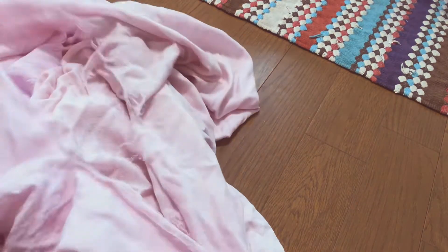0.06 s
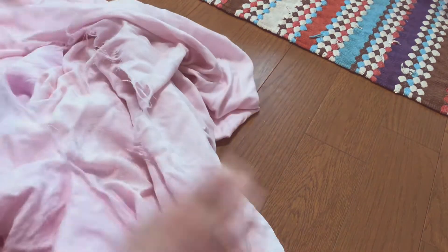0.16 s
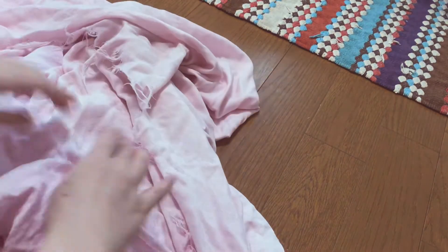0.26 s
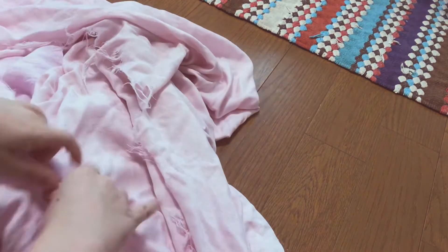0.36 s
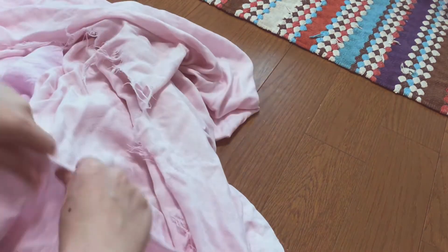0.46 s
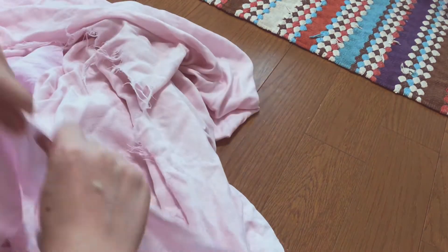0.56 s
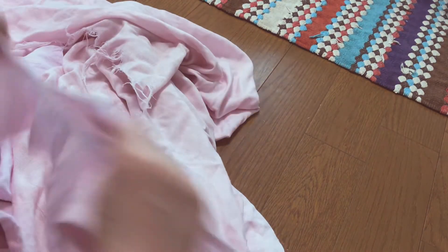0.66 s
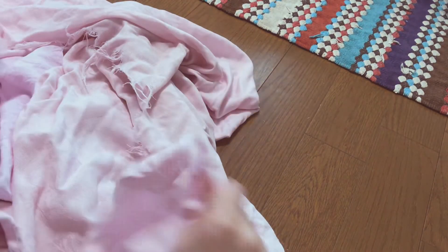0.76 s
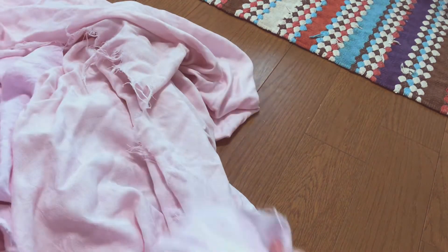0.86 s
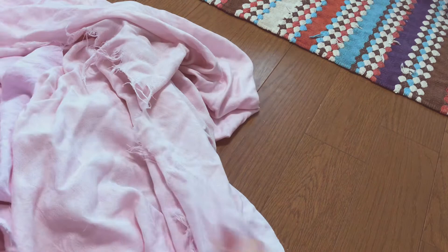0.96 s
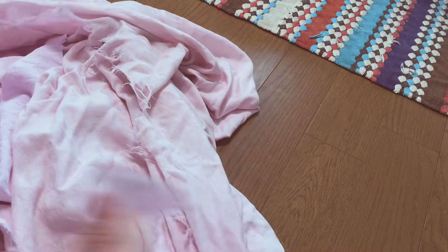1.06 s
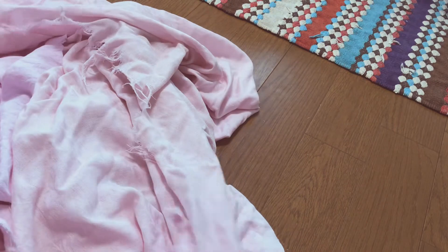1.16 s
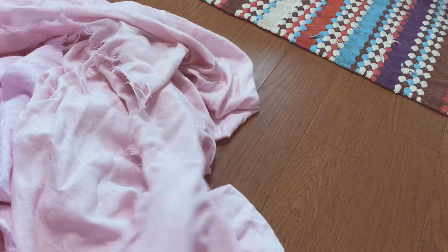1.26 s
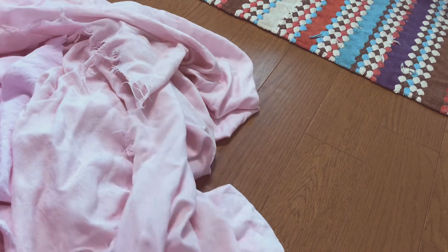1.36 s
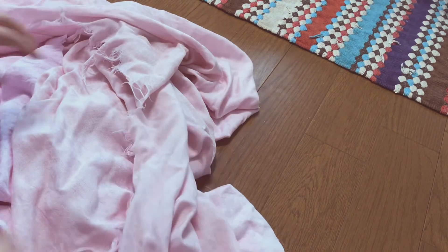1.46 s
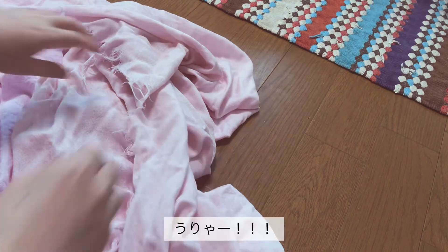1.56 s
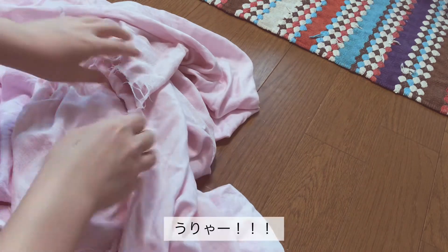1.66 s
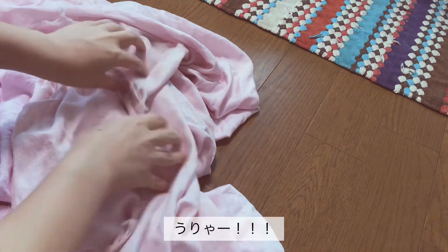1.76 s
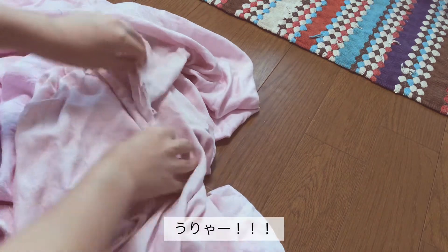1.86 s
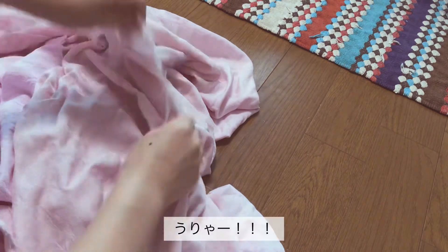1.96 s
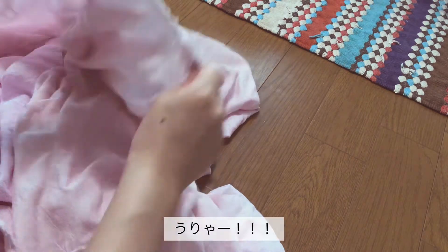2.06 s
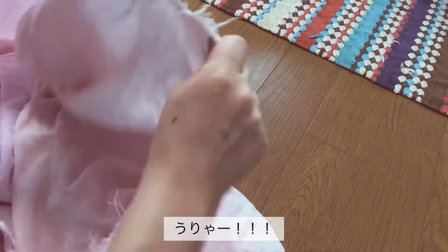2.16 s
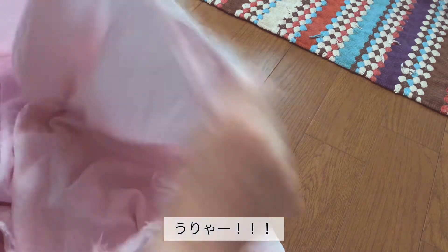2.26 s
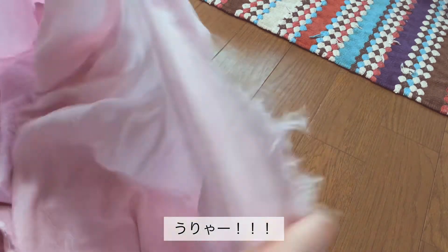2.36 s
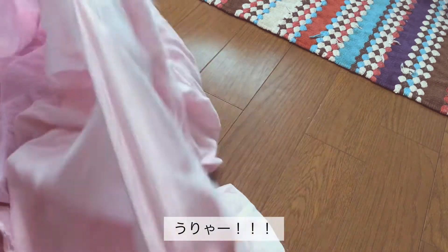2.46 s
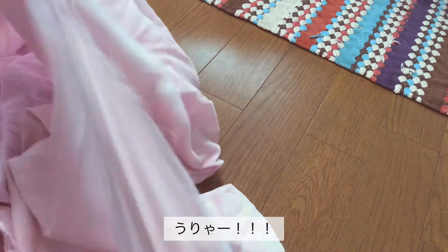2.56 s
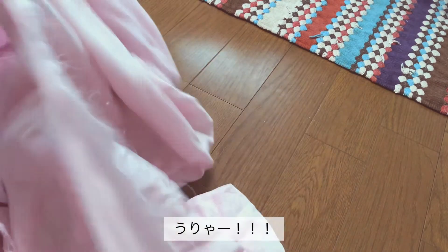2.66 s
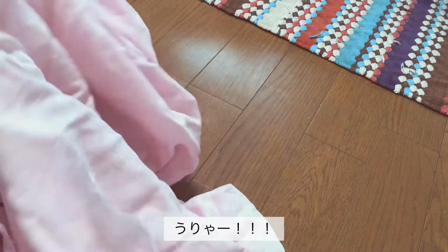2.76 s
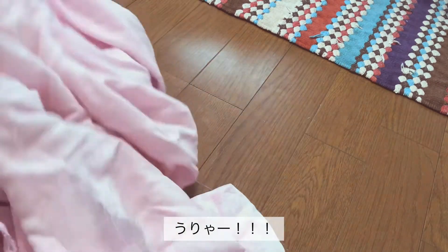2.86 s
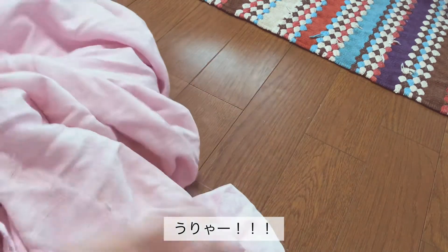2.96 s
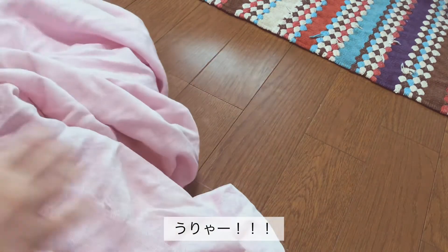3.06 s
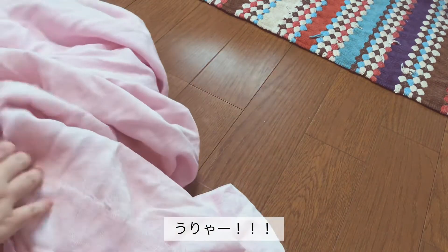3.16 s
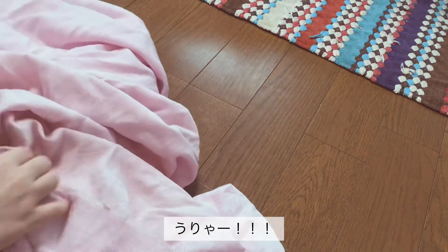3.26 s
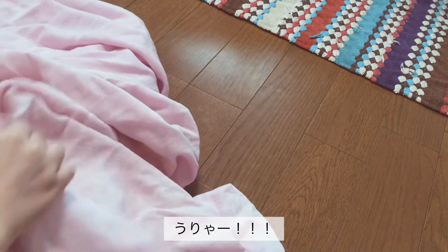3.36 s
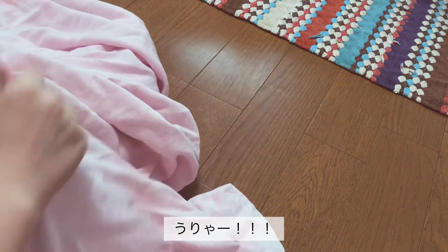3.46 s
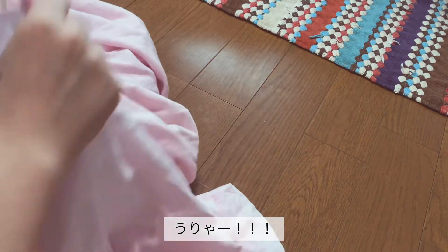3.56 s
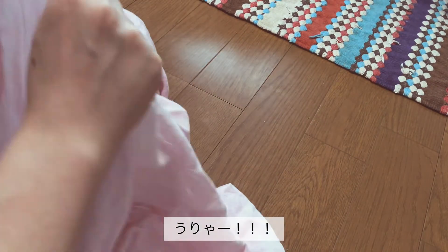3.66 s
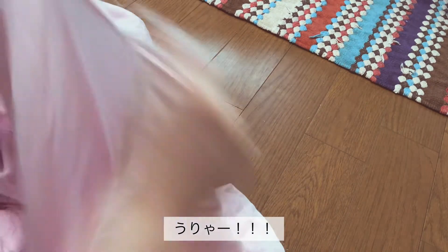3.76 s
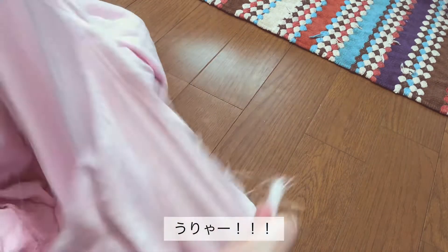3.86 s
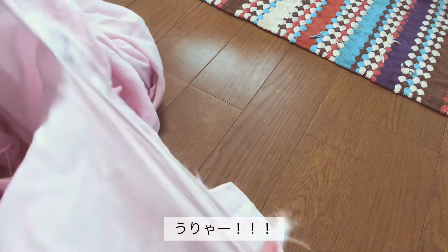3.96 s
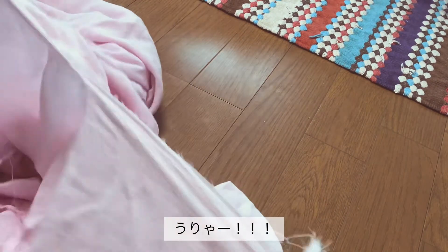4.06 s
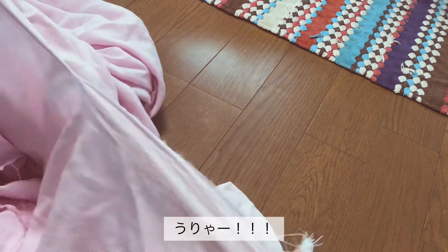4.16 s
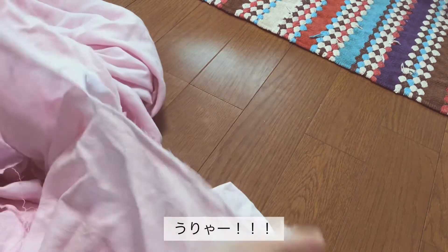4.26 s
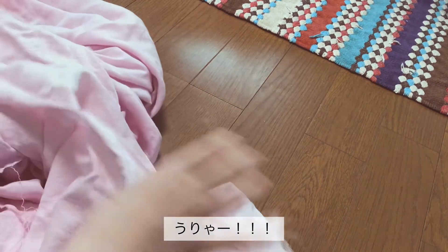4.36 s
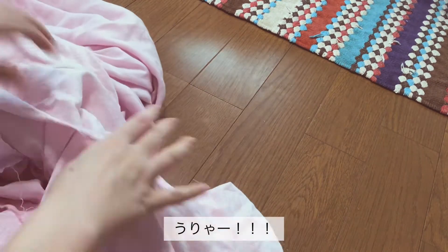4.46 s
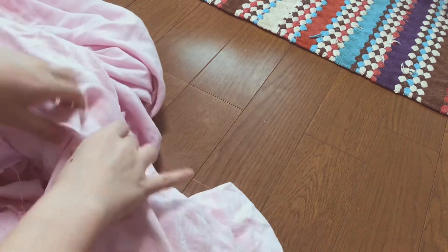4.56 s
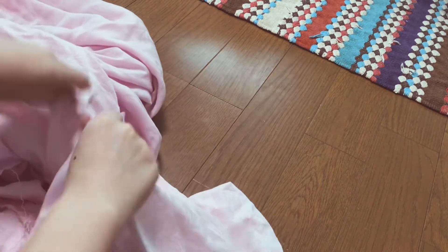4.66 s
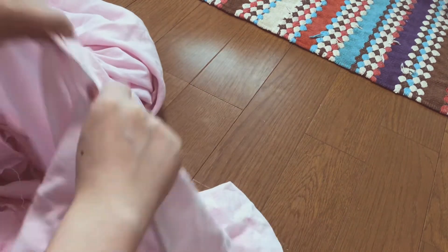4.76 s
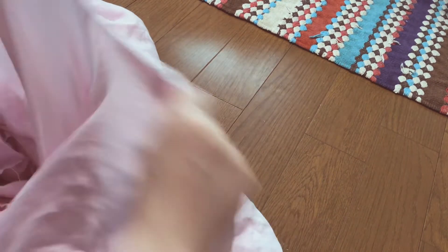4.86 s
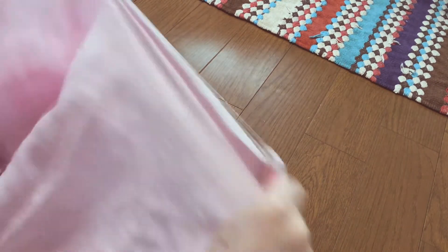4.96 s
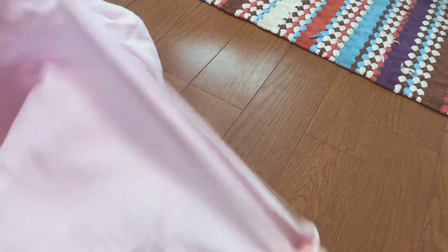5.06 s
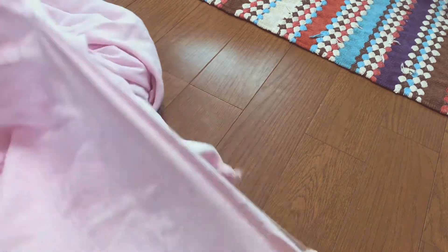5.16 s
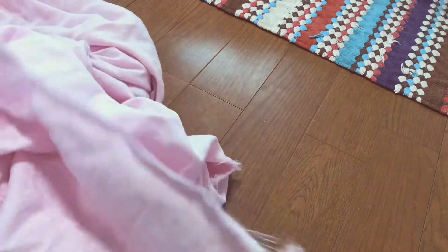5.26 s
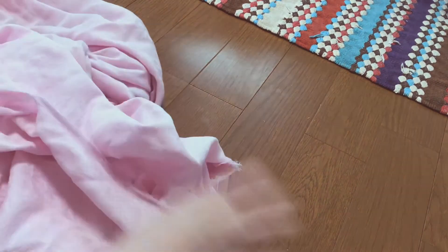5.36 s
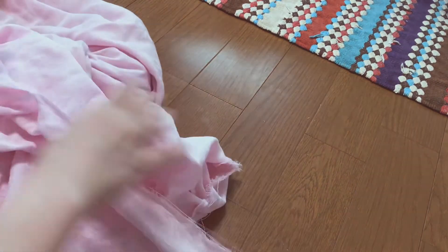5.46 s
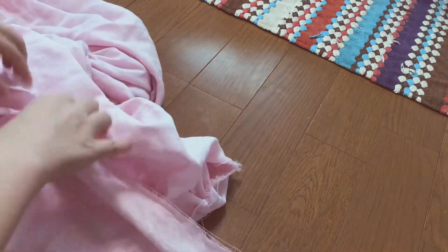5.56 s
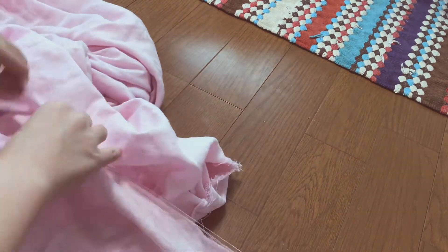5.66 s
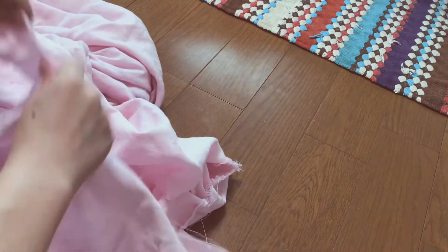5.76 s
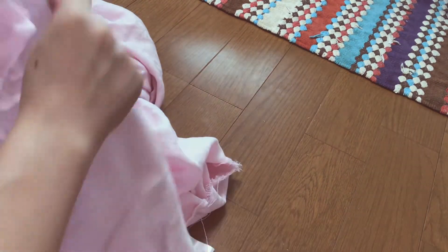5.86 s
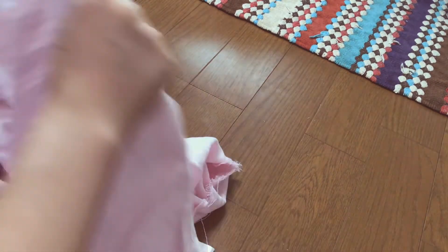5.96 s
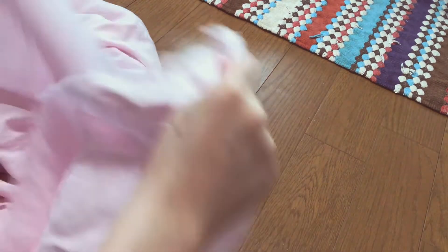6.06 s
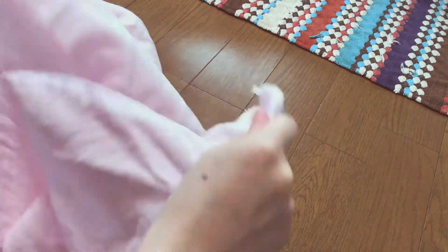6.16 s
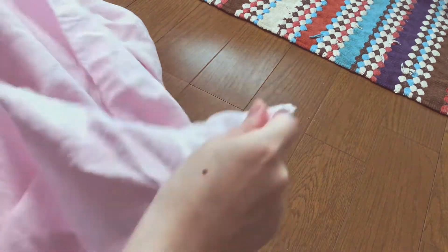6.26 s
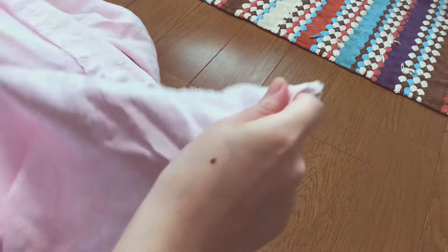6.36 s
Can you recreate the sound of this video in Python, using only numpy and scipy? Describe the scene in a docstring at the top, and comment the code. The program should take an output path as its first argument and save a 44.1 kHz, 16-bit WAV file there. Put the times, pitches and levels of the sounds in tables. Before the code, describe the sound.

An old cotton sheet is torn by hand into strips, close to the microphone in a small, quiet room. A brief, bright rip comes first, then a soft knock of a hand on the wooden floor. Slower, raspy rips and a fast one follow, with low flaps as the cloth comes free. The longest rip and a quick double one finish. Faint rustling and a low hum fill the gaps.

```python
"""An old cotton sheet is torn by hand into strips, close by, in a small room with a wooden floor.
Over a low hum a rip dies away at the very start. At 0.6 s comes the next: threads snap one after
another, from single ticks to a buzz, and the taut cloth sounds with them. A hand softly knocks the
floor at 1.8 s. Slower rips from 2.3 s and a fast one at 3.7 s make the sheet flap as it comes free.
The longest rip starts at 4.8 s, a quick double one at 5.9 s. Between rips the cloth rustles softly."""
import sys
import numpy as np
from scipy import signal
from scipy.fft import rfft, irfft, next_fast_len
from scipy.io import wavfile
from scipy.ndimage import uniform_filter1d, map_coordinates

SR = 44100
rng = np.random.default_rng(int(sys.argv[2]) if len(sys.argv) > 2 else 0)


def waveform_to_disk(signal):
    """Save audio, clipped to [-1, 1], as 16-bit WAV at the path in sys.argv[1]."""
    frames = np.transpose(np.atleast_2d(signal))
    scaled = np.clip(frames, -1, 1) * 32767
    samples = np.round(scaled).astype(np.int16)
    wavfile.write(sys.argv[1], SR, samples)


N = 282240
TIME = np.arange(N) / SR
CUTOFF_HZ = 16150
# the rips: start/s, build-up/s, hold/s, release/s, speed/(threads per s), crack/dB, cloth/dB,
# flutter/dB, top treble/dB, first strip pitch/Hz, last strip pitch/Hz, extra ring/dB
RIPS = [(0.630, 0.08, 0.073, 0.016, 4200, -31.5, -37.5, -59.5, 3, 1780, 1650, 0.5),
        (2.279, 0.052, 0.046, 0.1, 1500, -33, -35, -43.5, -28, 610, 540, 1.5),
        (2.583, 0.023, 0.091, 0.037, 820, -45.5, -48, -44.5, -9.5, 1010, 900, -3),
        (3.745, .1, .065, 0.11, 4010, -34.5, -35, -50, 0.5, 2000, 1530, -2),
        (4.082, .03, .03, .012, 283, -51.5, -53.5, -58.5, 7.5, 1450, 1354, 0),
        (4.828, 0.085, .19, .15, 4800, -29, -35.5, -49, 0.5, 680, 585, -0.5),
        (5.926, .025, 0.04, 0.022, 750, -46, -45.5, -53.5, -7, 2303, 2204, -4),
        (5.982, .024, .043, 0.0059, 4300, -32, -39, -55, -2, 3270, 1987, 3.5)]


def from_db(db):
    """Turn decibels into a factor to multiply by."""
    return 10 ** (np.asarray(db) / 20)


def rms_one(x):
    """Scale a signal to an average power of 1."""
    return x / np.sqrt(np.mean(x ** 2) + 1e-20)


def at_hz(points, hz):
    """Read a value off a curve whose frequencies are spaced by octaves."""
    known_hz, values = np.transpose(points)
    return np.interp(np.log(np.maximum(hz, 1)), np.log(known_hz), values)


def colour(x, spectrum):
    """Make some frequencies stronger and others weaker; white noise keeps its power."""
    size = 2 * next_fast_len(N // 2 + SR // 10)
    hz = np.arange(size // 2 + 1) * SR / size
    gain = from_db(at_hz(spectrum, hz))
    gain = gain / np.sqrt(np.mean(gain ** 2 * (hz < CUTOFF_HZ)))
    cepstrum = irfft(np.log(gain))[:size // 2]
    response = np.exp(2 * rfft(cepstrum, size) - cepstrum[0])   # rings after a click, never before
    return irfft(rfft(x, size) * response)[:N]


def drift(rate):
    """A random wobble of size about 1 that changes `rate` times a second."""
    return rms_one(np.interp(TIME * min(rate, SR / 2), np.arange(N), rng.standard_normal(N)))


def swell(s, half_s):
    """A smooth rise and fall of height 1 that peaks at time s."""
    return np.exp(-np.minimum(((TIME - s) / half_s) ** 2, 20))


def clicks(times, heights):
    """One-sample clicks at the given times."""
    return np.bincount(np.clip(np.round(np.asarray(times) * SR).astype(int), 0, N - 1), heights, N)


def ring(x, hz, fade_s):
    """Each click starts a pure tone that fades by 60 dB in fade_s."""
    decay, angle = from_db(-60 / (fade_s * SR)), 2 * np.pi * hz / SR
    return signal.lfilter([0, np.sin(angle)], [1, -2 * decay * np.cos(angle), decay ** 2], x + 1e-18)


def background(tone_db=-57.0, hiss_db=-62.0):
    """A low room rumble, a wavering hum, and a hiss that switches on and off."""
    # tone colours of the rumble and the hiss: f/Hz, relative level/dB
    rumble_colour = [(15, -8), (25, -30), (39, -7), (97, -5.5), (108, -14), (123, -21.5), (180, -18),
                     (206, -23), (373, -27.5), (575, -33), (641, -33.5), (7510, -47), (9840, -44.5),
                     (10700, -47.5), (16000, -43)]
    hiss_colour = [(100, 16), (600, 7), (2000, 2.5), (6000, 1.5), (16000, -5.5)]
    # three low hums and a faint high whine: f/Hz, width/Hz, level/dB
    hums = [(52.2, 3.2, -60), (69.7, 5.3, -67.5), (91.9, 4, -60), (9610, 150, -80)]
    # hiss at the opening, then during and after the bright rips: start/s, end/s
    hiss_spans = [(0, .415), (.70, 1.195), (3.83, 4.302), (4.89, 5.48), (6.0, 6.41)]
    rumble = from_db(tone_db) * rms_one(colour(rng.standard_normal(N), rumble_colour))
    hum = 0
    for hz, width, db in hums:
        phase = 2 * np.pi * hz * TIME
        hum += from_db(db) * rms_one(drift(2 * width) * np.cos(phase) + drift(2 * width) * np.sin(phase))
    hiss_on = sum((TIME >= start) * (TIME < end) for start, end in hiss_spans)
    return rumble + hum + from_db(hiss_db) * hiss_on * colour(rng.standard_normal(N), hiss_colour)


def room(x, first_echo_s=0.0044):
    """The walls send back a blur of echoes; the bass lasts longest."""
    # how long the room rings: f/Hz, time to fade by 60 dB/s
    fade_times = [(150, 0.33), (1000, 0.23), (4000, 0.28), (14000, 0.2)]
    t = TIME[:SR // 2]
    edges = np.geomspace(60, 20000, 7)
    tail = 0
    for low, high in zip(edges, edges[1:]):
        band_filter = signal.butter(2, [low, high], "band", fs=SR, output="sos")
        band = signal.sosfilt(band_filter, rng.standard_normal(len(t)))
        tail += band * from_db(-60 * t / at_hz(fade_times, np.sqrt(low * high)))
    tail *= t > first_echo_s
    return signal.fftconvolve(x, tail / np.sqrt(np.sum(tail ** 2)))[:N]


def rustle(grain_db=0.0):
    """A rip dies away at the very start; later, folds slide over each other in soft swells of noise."""
    # the dying rip (first two rows), then rustling cloth: t/s, half length/s, level/dB
    swells = [(0, 0.021, -41), (0.047, 0.061, -58.5), (1.943, 0.22, -78), (2.2, 0.2, -72.5),
              (2.865, 0.034, -64.5), (3.473, 0.059, -68), (3.63, .07, -70.5), (4.272, 0.043, -67),
              (4.79, .06, -66), (5.278, .1, -63), (5.78, 0.15, -70.5)]
    # tone colour of the cloth noise: f/Hz, relative level/dB
    noise_colour = [(100, 2), (400, 0.5), (1200, -0.48), (3000, -1.2), (7000, -0.5), (16000, -1.9)]
    level = sum(from_db(db) * swell(s, half_s) for s, half_s, db in swells)
    noise = rng.standard_normal(N) * from_db(grain_db * drift(200))   # smooth when grain_db is 0
    return level * rms_one(colour(noise, noise_colour))


def knocks():
    """A hand meets the floor through the cloth, and the board rings briefly."""
    # padded touches: t/s, strength/dB
    touches = [(1.778, -53)]
    # the floorboard's own tones: f/Hz, relative level/dB, time to fade by 60 dB/s
    board = [(385, 3.5, 0.028), (567, 6.5, 0.018), (720, -25, 0.016), (1690, -14, .015)]
    s, db = np.transpose(touches)
    push = clicks(s, from_db(db))
    return sum(ring(push, hz, fade_s) * from_db(tone_db) for hz, tone_db, fade_s in board)


def flaps():
    """A jerk of the sheet pushes the air in a short, low thump."""
    # the sheet jerks taut or flies loose: t/s, level/dB, f/Hz
    jerks = [(2.336, -26.5, 109), (2.398, -22, 82.5), (2.622, -28, 90), (2.669, -26.5, 104),
             (2.699, -33.5, 210), (3.814, -31, 160), (3.834, -23, 294), (3.847, -26, 113.5),
             (6.050, -34.5, 234.8)]
    return sum(ring(clicks([s], [from_db(db)]), hz, fade_s=0.036) for s, db, hz in jerks)


def strip_resonances(x, fade_s=0.0048):
    """The taut strip boosts a few pitches, which slide down as it gets longer."""
    # resonances of the strip between the hands: multiple of its pitch, width/Hz, boost/dB
    resonances = [(1.0, 160, 5.5), (1.68, 320, 4), (2.65, 484, 3)]
    out = x.copy()
    for start, build_s, hold_s, release_s, *_, first_hz, last_hz, ring_db in RIPS:
        end = start + build_s + hold_s + release_s
        span = slice(int(start * SR), int(end * SR))
        t = TIME[span]
        cycles = np.cumsum(np.interp(t, [start, end], [first_hz, last_hz])) / SR
        taut = np.clip(np.minimum(t - start, end - t) / fade_s, 0, 1)
        for multiple, width_hz, boost_db in resonances:
            turn = np.exp(2j * np.pi * multiple * cycles)
            decay = np.exp(-np.pi * width_hz / SR)
            # shift the sliding pitch to 0 Hz, smooth away the rest, shift it back
            band = 2 * np.real(turn * signal.lfilter([1 - decay], [1, -decay], x[span] / turn))
            out[span] += (from_db(boost_db + ring_db) - 1) * taut * band
    return out


def edge_echo(x, delay_ms, strength=0.11):
    """Snaps come back upside down along the torn edge, later as the tear grows."""
    late = map_coordinates(x, [np.arange(N) - delay_ms * SR / 1000], order=3)
    return (x - strength * late) / np.sqrt(1 + strength ** 2)


def brightness(x, treble_db, corner_hz=8500):
    """Set the top treble: a slack pull or cloth in the way dulls the crack."""
    lower = signal.sosfilt(signal.butter(1, corner_hz, fs=SR, output="sos"), x)
    return lower + from_db(treble_db) * (x - lower)


def fray(snaps, fibre_share, fray_s):
    """Each thread gives one sharp click, then a short spray of parting fibres."""
    decay = np.exp(-1 / (fray_s * SR))
    spray_power = signal.lfilter([1 - decay], [1, -decay], snaps ** 2 + 1e-18)
    spray = np.sqrt(spray_power) * rng.standard_normal(N)
    return np.sqrt(1 - fibre_share) * snaps + np.sqrt(fibre_share) * spray


def strong_threads():
    """A strong thread breaks on its own with a tick and a kick to the cloth."""
    # single threads breaking: t/s, crack/dB, cloth/dB
    snaps = [(0.008, -38, -35.5), (0.637, -39, -58), (0.6432, -39, -51), (2.2888, -42, -42),
             (2.324, -35, -35), (2.3897, -24, -43), (2.4233, -39, -32), (2.439, -33.5, -42.5),
             (2.6054, -32, -36.5), (2.629, -34.5, -54), (2.6343, -31, -33), (2.6725, -42, -32.5),
             (2.6907, -36, -36), (2.704, -37.5, -33.5), (3.9471, -33, -59.5), (3.963, -35, -50),
             (4.0865, -39.5, -52), (4.093, -43.5, -52), (4.1022, -39, -45), (4.127, -52, -47),
             (4.8067, -51.5, -54), (5.159, -31.5, -37), (5.172, -33.5, -33), (5.1825, -34.5, -42.5),
             (5.219, -39, -44), (5.9126, -52.5, -57), (5.937, -37.5, -49), (5.947, -35, -45)]
    s, crack_db, cloth_db = np.transpose(snaps)
    size = np.sqrt(0.0024 * SR)   # packs 2.4 ms worth of energy into one click
    ticks = fray(clicks(s, size * from_db(crack_db)), fibre_share=.58, fray_s=.0007)
    kicks = fray(clicks(s, size * from_db(cloth_db)), fibre_share=.7, fray_s=.0014)
    return ticks, kicks


def yanks():
    """Extra tugs within a rip briefly add decibels to the crack and the cloth."""
    # the tugs: t/s, half length/s, crack lift/dB, cloth lift/dB
    tugs = [(0.733, 0.018, 3.5, 8.5), (.784, 0.0054, 3, 5.5), (2.36, 0.013, 2, 5.5),
            (3.835, .007, 7.5, 4.5), (3.849, .006, 11, 3), (4.95, 0.009, 2, 6.5), (5.083, .028, 1, 5),
            (6.045, .005, 4.5, 5)]
    return sum(np.outer(lifts_db, swell(s, half_s)) for s, half_s, *lifts_db in tugs)


def hand_pull(slowest_per_s=190, slowing_octaves_per_s=8, rise_db=23, fall_db=35, dull_db=7.5):
    """Each pull builds up, holds and lets go, setting speed, loudness and brightness together."""
    rips = np.array(RIPS)
    current = np.maximum(np.searchsorted(rips[:, 0], TIME, "right") - 1, 0)
    start, build_s, hold_s, release_s, top_per_s = rips[current, :5].T
    crack_db, cloth_db, flutter_db, treble_db = rips[current, 5:9].T
    age = TIME - start
    held = np.maximum(age - build_s, 0)
    build_left = np.clip(1 - age / build_s, 0, 1)
    letting_go = np.clip((held - hold_s) / release_s, 0, 1)
    slack = build_left + letting_go
    fastest = top_per_s * 2 ** (-slowing_octaves_per_s * np.minimum(held, hold_s))
    per_s = fastest ** (1 - slack) * slowest_per_s ** slack
    grip = np.minimum((1 - build_left) / 0.16, 1) * (letting_go < 1)   # tightens from silence
    pull_db = 20 * np.log10(grip + 1e-9) - rise_db * build_left - fall_db * letting_go ** 1.31
    torn = np.clip(age / (build_s + hold_s + release_s), 0, 1)
    echo_ms = 0.056 + 0.385 * torn ** 2
    return (per_s, echo_ms, crack_db + pull_db, cloth_db + pull_db,
            flutter_db + 0.49 * pull_db, treble_db - dull_db * slack)


def thread_run(per_s, jitter=.35, spread_db=2.6, slip_db=4.5, threads_per_slip=5.5):
    """The tear crosses the weave thread by thread, sticking and slipping every few threads."""
    crossed = np.cumsum(per_s * np.exp(jitter * (drift(3000) - jitter / 2))) / SR
    breaks = np.diff(np.floor(crossed), prepend=0) > 0
    slip = np.cos(2 * np.pi * crossed / threads_per_slip + 1.69 * drift(160))   # makes slow tears rasp
    run = breaks * from_db(spread_db * np.clip(rng.standard_normal(N), -2, 2) + slip_db * slip)
    power = np.maximum(uniform_filter1d(run ** 2, size=600), 0)
    return run / np.sqrt(power + 1e-5)   # evened out, so the pull sets the loudness


def tearing():
    """Snapping threads give a bright crack, shake the taut cloth and set it fluttering."""
    # tone colours of the crack, the cloth and its low flutter: f/Hz, relative level/dB
    crack_colour = [(1500, -23), (3000, -0.5), (4200, 0), (6500, 1.5), (10000, 0), (12500, 4), (16000, -1)]
    cloth_colour = [(300, -16.5), (560, -4.5), (720, -4.5), (1100, 0.5), (1350, -2), (1650, 0), (2400, 0),
                    (3300, -0.5), (5000, -8), (9000, -28.5)]
    flutter_colour = [(60, -41), (130, -9.5), (280, 2), (450, -3), (720, -7), (1500, -34.5)]
    per_s, echo_ms, crack_db, cloth_db, flutter_db, treble_db = hand_pull()
    crack_lift_db, cloth_lift_db = yanks()
    per_s = per_s * from_db(.5 * crack_lift_db)   # a tug also speeds up the tear
    run = thread_run(np.maximum(per_s, 50))
    cracks = fray(run * from_db(crack_db + crack_lift_db), fibre_share=.38, fray_s=.0005)
    shakes = fray(run * from_db(cloth_db + cloth_lift_db), fibre_share=.45, fray_s=.001)
    ticks, kicks = strong_threads()
    flutter = fray(run * from_db(flutter_db + cloth_lift_db), fibre_share=.96, fray_s=.00064)
    crack = edge_echo(colour(cracks + ticks, crack_colour), echo_ms)
    cloth = colour(shakes + kicks, cloth_colour) + colour(flutter, flutter_colour)
    return brightness(crack, treble_db), cloth


def scene(crack_room_db=-12.0, body_room_db=-10.0, cloth_db=-3.0):
    """The crack is aimed at the listener; the broad sheet spreads more of its sound round the room."""
    crack, cloth = tearing()
    crack = strip_resonances(crack)
    body = from_db(cloth_db) * strip_resonances(cloth) + flaps() + knocks()
    echoes = room(from_db(crack_room_db) * crack + from_db(body_room_db) * body)
    return (crack + body + echoes + rustle() + background())[None]


def record(dry):
    """The deepest bass is thinned and the highest treble is cut."""
    thin = signal.sosfilt(signal.butter(4, 37, "high", fs=SR, output="sos"), dry)
    return signal.sosfilt(signal.ellip(12, .1, 80, CUTOFF_HZ, fs=SR, output="sos"), thin)


dry = scene()
out = record(dry)
waveform_to_disk(out)
```